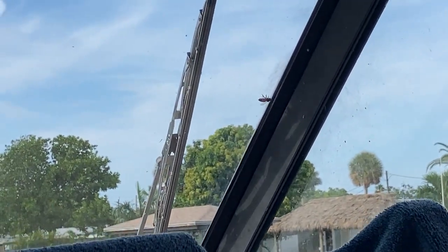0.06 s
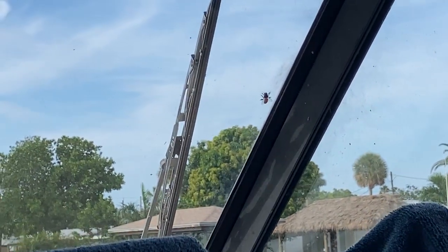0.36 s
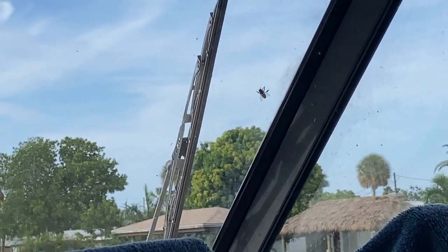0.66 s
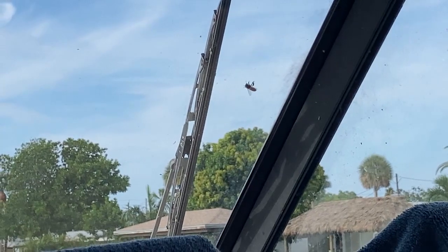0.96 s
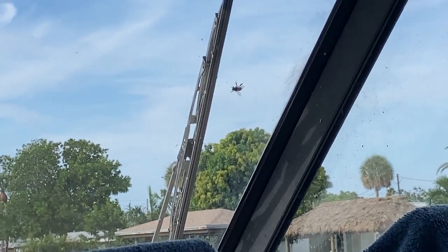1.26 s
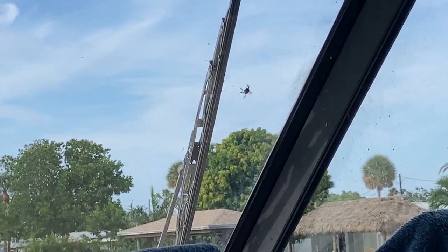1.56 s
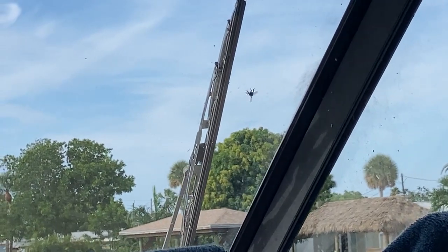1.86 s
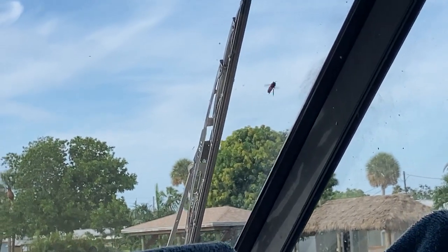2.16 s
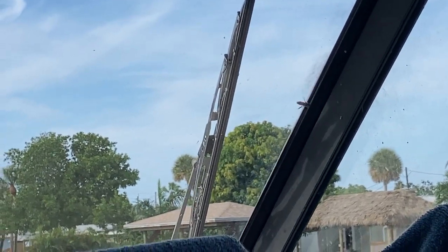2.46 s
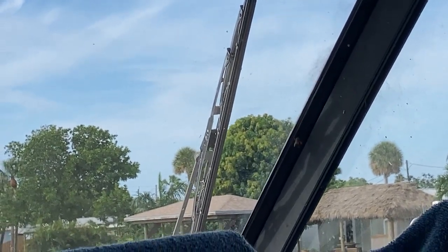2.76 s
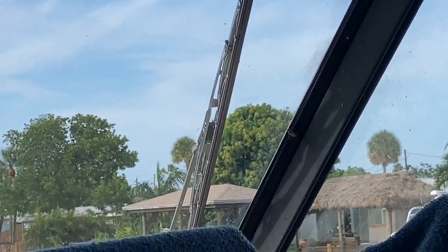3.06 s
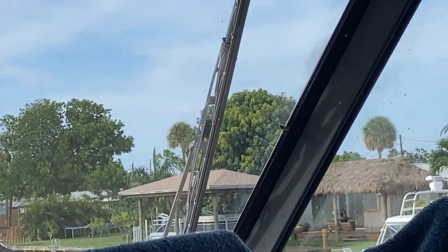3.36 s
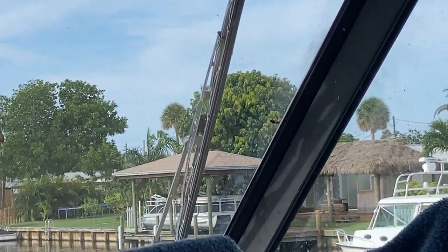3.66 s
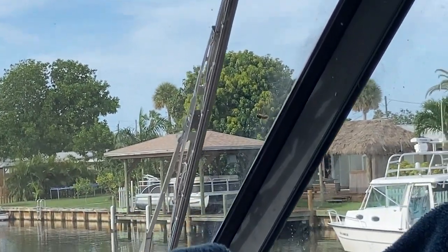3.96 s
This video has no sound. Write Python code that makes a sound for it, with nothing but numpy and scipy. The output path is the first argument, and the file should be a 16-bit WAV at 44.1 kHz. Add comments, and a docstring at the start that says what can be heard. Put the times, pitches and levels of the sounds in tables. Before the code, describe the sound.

Something like a hand rubs and squeaks close by inside an idling boat's cabin.

```python
"""Inside the cabin of a slowly moving boat, the engine hums at idle under a low rumble throughout.
From the start something rubs close by on the right in long swishing strokes, probably a hand sliding
over the wheel or its cover; it rings faintly, rustles and bumps now and then.
Dull scuffs join around the middle and short rough chirps grow more frequent;
the last stroke ends in a thin squeak."""
import sys
import numpy as np
from scipy import signal
from scipy.fft import rfft, irfft
from scipy.io import wavfile

SR = 44100
rng = np.random.default_rng(int(sys.argv[2]) if len(sys.argv) > 2 else 0)


def store_pcm(level_fs):
    """Save levels as 16-bit WAV."""
    pcm = np.round(np.clip(level_fs, -1, 1) * 32767).astype(np.int16)
    wavfile.write(sys.argv[1], SR, np.atleast_2d(pcm).T)


N = 176400


def rubbing(gain_db=4.5, flutter_db=0.78, body_hz=2080, treble_hz=4770):
    """Dense tiny slips hiss and ring the rubbed part; the stroke sets level, brightness and body."""
    # envelope of the strokes: time_s, relative_db
    strokes = [(0.0, -71.5), (0.09, -65.5), (0.13, -61.5), (0.15, -55.5), (0.23, -52), (0.49, -53.5),
               (0.51, -52.5), (0.6, -58), (0.67, -61.5), (0.76, -61.5), (0.85, -58.5), (0.86, -58),
               (1.26, -52.5), (1.48, -62.5), (1.53, -56), (1.7, -51), (1.73, -53), (1.78, -50.5),
               (1.88, -51), (1.89, -49.5), (1.96, -53.5), (1.98, -52), (2.24, -69.5), (2.32, -63),
               (2.41, -51.5), (2.49, -54), (2.51, -58), (2.67, -53.5), (2.73, -54), (2.85, -60.5),
               (3.0, -58.5), (3.09, -52.5), (3.19, -55), (3.22, -57.5), (3.38, -56), (3.41, -54.5),
               (3.46, -57.5), (3.56, -67), (3.6, -64.5), (3.665, -60), (3.705, -55), (3.78, -54.5),
               (4.0, -56.5)]
    # colour of the friction hiss: frequency_hz, gain_db
    colour = [(300, -19), (900, -23.5), (1250, -3.5), (1600, -2.5), (2100, -2), (2900, -1), (4100, -2),
              (5000, -4.5), (6000, -5.5), (7200, -10), (9000, -11), (11000, -17), (13500, -25),
              (15700, -36)]
    # brightness of the strokes: time_s, treble_gain_db
    brightness = [(0, 4), (.25, -2), (.42, -0.5), (.67, -3.5), (.85, 0.5), (1.25, -1), (1.45, -1), (1.6, 0),
                  (1.9, -2.5), (2.05, -1.5), (2.25, -6), (2.42, -2.5), (2.52, 3), (2.6, 1.5), (2.665, 4),
                  (2.74, -1.5), (2.84, -2.5), (2.97, 3), (3.1, 1), (3.29, 1), (3.41, -1.5), (3.6, 0),
                  (3.66, -2.5), (3.73, 2), (3.85, 2.5), (4, 3)]
    # fullness of the strokes: time_s, body_gain_db
    fullness = [(0, 9), (.2, -2.5), (.5, -0.5), (.85, 0), (1.1, 3), (1.3, 1.5), (1.6, 0.5), (1.85, -3),
                (2.03, 4.5), (2.42, -1.5), (2.65, -0.5), (2.8, 3), (3.1, 0.5), (3.4, -1.5), (3.75, 1),
                (3.9, -7.5), (4, -4)]
    friction = grains(per_s=9000, spread_db=2.5) + 1.4 * rng.standard_normal(N)
    slip_spectrum = rfft(glass_echoes(friction)) * undb(over_pitch(colour))
    swish = unit(irfft(slip_spectrum, N) + ringing(slip_spectrum)) + catches()
    body = lowpass(swish, body_hz)
    treble = swish - lowpass(swish, treble_hz)
    swish += treble * (undb(over_time(brightness)) - 1)
    swish += body * (undb(over_time(fullness)) - 1)
    return swish * undb(over_time(strokes) + gain_db + flutter_db * walk(30))


def ringing(slip_spectrum, spurt_db=3.5, drift=0.003):
    """The rubbed part's modes ring in spurts; their pitch wavers together as the contact moves."""
    # resonances of the rubbed part: pitch_hz, bandwidth_hz, gain_db
    modes = [(1481, 17, 6), (1574, 72, -6), (1662, 31, 0.5), (1721, 40, 4.5), (1936, 41, 7.5),
             (2025, 24, -17), (2534, 30, -4), (2646, 22, 5.5), (2900, 26, 3.5), (3310, 33, -2),
             (3694, 44, -1.5), (4140, 54, -1), (4350, 30, -2)]
    ring = np.zeros(N)
    for hz, width, db in modes:
        mode = irfft(slip_spectrum / (1 + 2j * (freqs() - hz) / width), N)
        ring += mode * undb(db + spurt_db * walk(6.4))
    samples = np.arange(N)
    warped = samples + np.cumsum(drift * walk(6.015))
    return np.interp(warped % N, samples, ring)


def catches(count=70, low_hz=1781, high_hz=6764, mean_s=0.083, gain_db=-5.5):
    """Brief catches sing inside the hiss at random pitches, weaker the higher they are."""
    out = np.zeros(N)
    for when, height, length, glide in rng.random((count, 4)):
        start = int(when * N)
        t = np.arange(min(int(mean_s * (.5 + length) * SR), N - start)) / SR
        hz = low_hz * (high_hz / low_hz) ** height
        wave = np.sin(2 * np.pi * hz * t * (1 + (glide - .5) * t / 2))
        out[start:start + len(t)] += np.sqrt(2) * wave * np.hanning(len(t)) * low_hz / hz
    return out * undb(gain_db + 2 * walk(62))


def glass_echoes(direct, count=4, near_ms=2, far_ms=15, drift_ms=0.05, echo_db=-4):
    """Reflections off the glass drift with the contact, so narrow peaks wander through the hiss."""
    out = direct
    fine = signal.resample_poly(direct, 8, 1)  # oversampled so the delays glide smoothly
    for place in (np.arange(count) + rng.random(count)) / count:
        delay_ms = near_ms + place * (far_ms - near_ms) + drift_ms * walk(2.94)
        index = (8 * (np.arange(N) - delay_ms * SR / 1000)).astype(int)
        out = out + undb(echo_db) * fine.take(index, mode="wrap")
    return out / np.sqrt(1 + count * undb(echo_db) ** 2)


def squeaks(squeak_rough=0.02, chirp_rough=0.027, overtone_db=-14, gain_db=-5.5):
    """Where the contact sticks, it sings: a thin squeak with a bright overtone, and rougher chirps."""
    # contour of the closing squeak: time_s, pitch_hz, relative_db
    squeak = [(3.46, 2300, -62), (3.535, 2330, -60), (3.572, 2410, -50.5), (3.595, 2470, -54),
              (3.63, 2480, -58), (3.67, 2340, -49), (3.71, 2080, -52), (3.74, 2100, -50), (3.79, 2400, -54),
              (3.815, 2430, -49), (3.86, 2500, -54), (3.875, 2490, -54), (3.9, 2480, -53),
              (3.96, 2280, -53), (4, 2130, -64)]
    # short rough chirps: start_s, length_s, pitch_hz, glide_hz_per_s, relative_db
    chirps = [(0.792, 0.07, 1990, -200, -53.5), (2.36, 0.066, 1930, 0, -49), (2.54, .06, 1930, 0, -60),
              (2.765, 0.31, 1935, 0, -58), (2.976, 0.14, 1925, -2, -45), (3.077, 0.16, 2070, 0, -50.5),
              (3.081, 0.068, 2740, -500, -49), (3.218, 0.061, 1970, 0, -55), (3.38, 0.076, 1950, 0, -47.5),
              (3.388, 0.05, 2600, 0, -51), (3.673, 0.11, 3014, -1200, -46.5),
              (3.737, 0.081, 1930, 500, -50), (3.734, .12, 3250, 895, -49.5)]
    t = times()
    pitch = over_time(squeak) * (1 + squeak_rough * walk(178))
    sound = undb(overtone_db) * tone(4 * pitch) + tone(pitch)
    sound *= undb(over_time(squeak, column=2) + 2.4 * walk(82)) * (t > squeak[0][0])
    jitter = 1 + chirp_rough * walk(195)
    flicker = undb(2.0 * walk(140))
    for start, length, hz, glide, db in chirps:
        pitch = (hz + glide * np.clip(t - start, 0, length)) * jitter
        sound += tone(pitch) * swell(start, length) * undb(db) * flicker
    return sound * undb(gain_db)


def rustle(flutter_db=0.96):
    """Fine bright crackles, likely cloth, come and go."""
    # envelope of the rustle: time_s, level_db
    envelope = [(0, -69), (.75, -70), (1.45, -69), (1.7, -79), (1.95, -63), (2.2, -63), (2.255, -65.5),
                (2.35, -56.5), (2.46, -62), (2.53, -70), (2.65, -64), (2.9, -65.5), (3.1, -73),
                (3.42, -63.5), (3.53, -79), (3.75, -71), (4, -72)]
    # colour of the crackles: frequency_hz, gain_db
    colour = [(300, -7.5), (700, -3.5), (1300, -1), (2500, -4), (6000, -6.5), (10500, -4), (13000, -9),
              (15700, -18)]
    clicks = grains(per_s=4100, spread_db=2.5)
    crackle = unit(irfft(rfft(clicks) * undb(over_pitch(colour)), N))
    return crackle * undb(over_time(envelope) + flutter_db * walk(60))


def scuffs():
    """Soft, dull contacts swell between and under the strokes."""
    # one long quiet scuff under shorter ones: start_s, length_s, level_db
    contacts = [(1.6, 3.2, -66.5), (2.02, 0.31, -62), (2.353, 0.21, -58.5), (2.637, 0.21, -63),
                (3.255, 0.25, -59.5)]
    # their muffled colour: frequency_hz, gain_db
    colour = [(70, -9.5), (150, 4.5), (250, -0.5), (450, -0.5), (700, -1.5), (1100, -9.5), (2000, -27),
              (5000, -34)]
    return cabin_noise(colour) * sum(undb(db) * swell(start, length) for start, length, db in contacts)


def knocks(decay_s=0.02):
    """Light, heavily damped bumps: bursts of dull noise that die away at once."""
    # bumps: start_s, level_db
    bumps = [(0.195, -57.5), (1.795, -52), (1.865, -56), (2.785, -52), (3.043, -59), (3.396, -50.5)]
    # their low-mid colour: frequency_hz, gain_db
    colour = [(120, -35), (300, 9.5), (650, 4), (1000, 4.5), (1500, -12), (5000, -40)]
    t = times()
    envelope = sum(undb(db) * (t > start) * np.exp(-abs(t - start) / decay_s) for start, db in bumps)
    return cabin_noise(colour) * envelope


def engine(firing_hz=48.6, firing_db=-42, wander=0.012, throb_db=0.9):
    """The idling engine's firing tone throbs a little; its weak overtones waver more."""
    # overtones of the hum: multiple_of_firing_rate, level_db
    overtones = [(2, -67), (2.43, -65.5), (4, -83), (4.93, -74), (6, -76), (7.02, -76), (9, -78), (11, -82)]
    hz = firing_hz * (1 + wander * walk(5.55))
    hum = undb(firing_db + throb_db * walk(18)) * tone(hz)
    for multiple, db in overtones:
        hum += undb(db + 4.53 * walk(7.5)) * tone(multiple * hz)
    return hum


def rumble(level_db=-54, sway_db=2.0):
    """A low rumble fills the cabin, slowly rising and falling."""
    # bass-heavy colour of the cabin: frequency_hz, gain_db
    colour = [(22, -48), (36, -11.5), (62, 3.5), (80, -7), (125, -7), (180, -14), (300, -19), (650, -21.5),
              (1000, -27), (2500, -33.5), (6000, -50), (15000, -52)]
    return cabin_noise(colour) * undb(level_db + sway_db * walk(1.5))


def cabin_noise(colour):
    """Coloured stereo noise, alike on both sides in the bass and wide in the treble."""
    # likeness of left and right: frequency_hz, correlation
    likeness = [(60, 0.58), (150, 0.82), (300, 0.74), (600, 0.38), (1200, 0.018)]
    alike = over_pitch(likeness)
    spectra = rfft(rng.standard_normal((2, N))) * undb(over_pitch(colour))
    mid, side = spectra * np.sqrt([1 + alike, 1 - alike])
    return unit(irfft(np.array([mid + side, mid - side]), N))


def from_the_right(source):
    """Direct sound reaches the left side late; the rest arrives scattered, unrelated on each side."""
    # stereo path: frequency_hz, left_lag_ms, direct_share, left_minus_right_db
    path = [(504, 0.084, 0.31, 16.5), (1540, 0.4, 0.73, 0), (1990, 0.31, 0.22, -0.5), (2730, 0.32, 0.21, 0),
            (3800, 0.374, 0.27, 0.5), (5680, 0.31, 0.75, -3), (6900, 0.3, 0.35, 0.5), (8930, 0.2742, 1, 0),
            (11600, 0.2665, 0.82, 0), (14200, 0.25, .82, 0.5), (16100, 0.29, 0.31, -4)]
    lag_ms, share, pan_db = (over_pitch(path, column) for column in (1, 2, 3))
    near, left, right = (rfft(source()) for _ in range(3))
    delay = np.exp(-2j * np.pi * freqs() * lag_ms / 1000)
    direct = np.sqrt(share) * np.array([near * delay, near])
    scattered = np.sqrt(1 - share) * np.array([left, right])
    return irfft((direct + scattered) * undb(np.array([pan_db, -pan_db]) / 2), N)


def undb(db):
    """Decibels to gain."""
    return 10 ** (np.asarray(db) / 20)


def unit(x):
    """Scale to rms 1."""
    return x / np.sqrt(np.mean(x ** 2))


def times():
    """Time of every sample."""
    return np.arange(N) / SR


def freqs():
    """Frequency of every spectral bin, at least 1 Hz."""
    return np.maximum(np.arange(N // 2 + 1) * SR / N, 1)


def over_time(table, column=1):
    """One column of a table, joined by straight lines in time."""
    rows = np.array(table, float)
    return np.interp(times(), rows[:, 0], rows[:, column])


def over_pitch(table, column=1):
    """One column of a table, joined on a log-frequency axis."""
    rows = np.array(table, float)
    return np.interp(np.log(freqs()), np.log(rows[:, 0]), rows[:, column])


def lowpass(x, hz):
    """A steep treble cut with no phase shift."""
    return irfft(rfft(x) / (1 + (freqs() / hz) ** 10), N)


def walk(rate_hz, size=4096):
    """Smooth random motion of spread 1, up to about rate_hz."""
    hz = np.arange(size // 2 + 1) * SR / N
    coarse = unit(irfft(rfft(rng.standard_normal(size)) / (1 + (hz / rate_hz) ** 4), size))
    return np.interp(np.linspace(0, size - 1, N), np.arange(size), coarse)


def tone(hz):
    """A sine of rms 1 that follows a pitch curve."""
    return np.sqrt(2) * np.sin(2 * np.pi * (np.cumsum(hz) / SR + rng.random()))


def swell(start, length):
    """A rounded rise and fall."""
    return np.sin(np.pi * np.clip((times() - start) / length, 0, 1))


def grains(per_s, spread_db):
    """Random tiny clicks of uneven size."""
    clicks = (rng.random(N) < per_s / SR) * rng.standard_normal(N)
    return unit(clicks * undb(spread_db * rng.standard_normal(N)))


def scene(lean_right_db=1.45):
    """Engine and rumble form the bed; the rubbing comes from close by on the right."""
    balance = undb(np.array([[-lean_right_db], [lean_right_db]]) / 2)
    bed = (engine() + rumble()) * balance
    close = from_the_right(lambda: rubbing() + rustle() + squeaks())
    return bed + scuffs() + knocks() + close


def record(dry):
    """A steep low-pass takes off the air above 15750 Hz."""
    return signal.sosfilt(signal.ellip(10, .2, 80, 15750, fs=SR, output="sos"), dry)


dry = scene()
out = record(dry)
store_pcm(out)
```